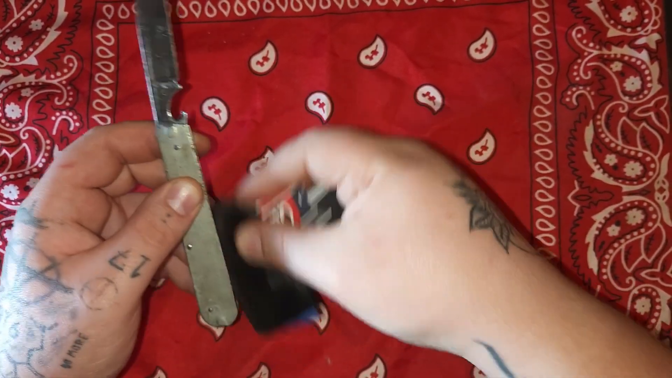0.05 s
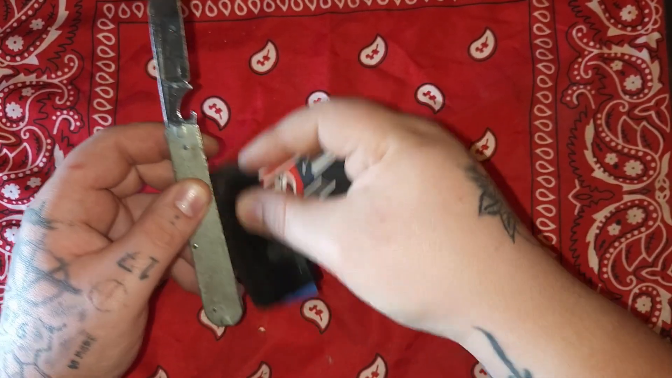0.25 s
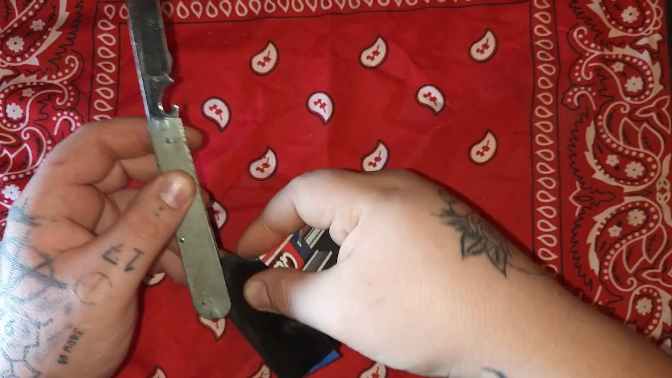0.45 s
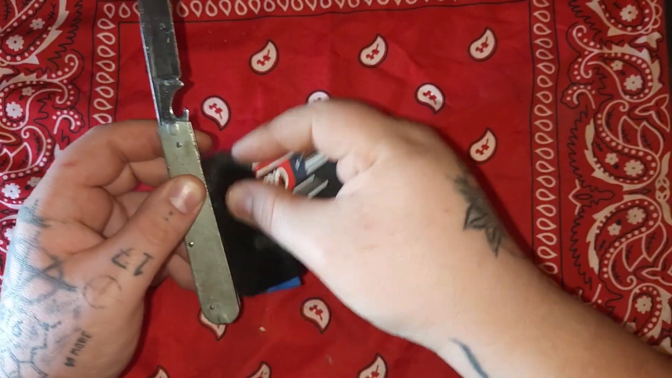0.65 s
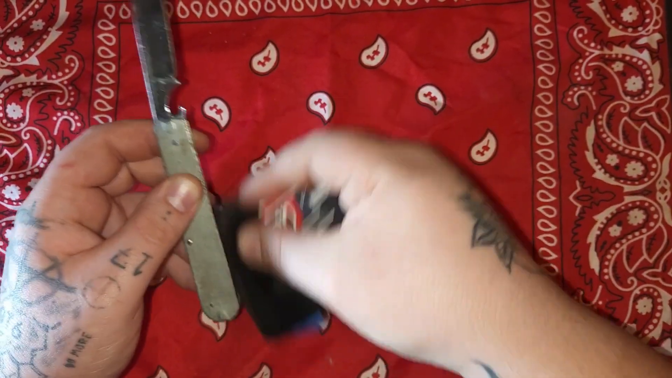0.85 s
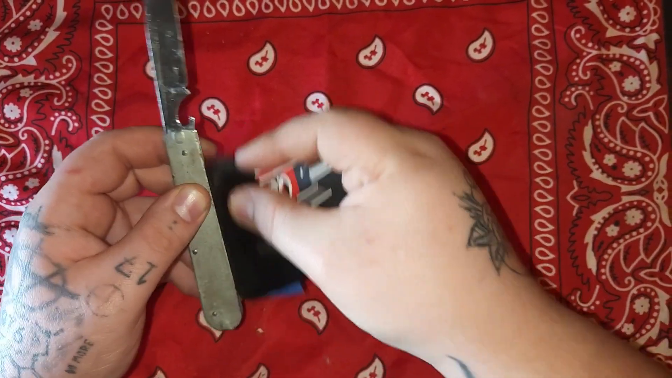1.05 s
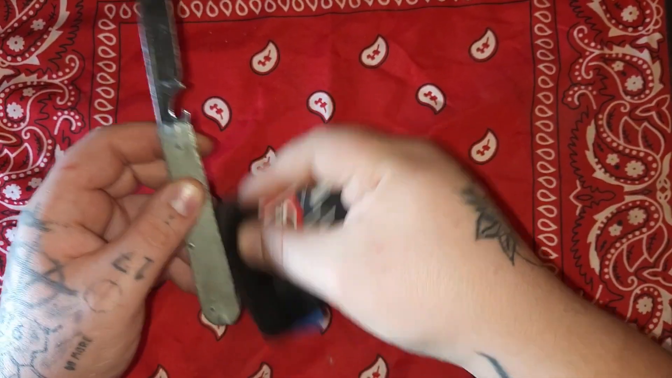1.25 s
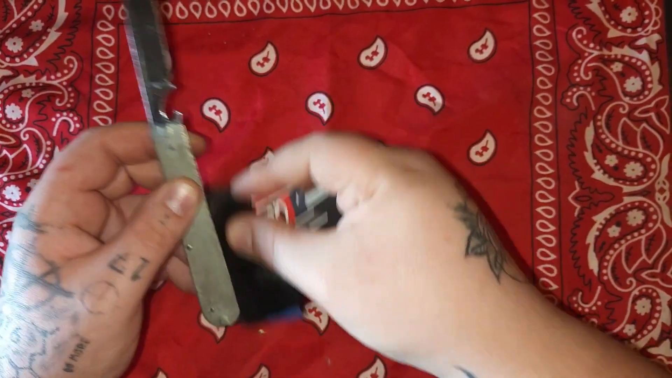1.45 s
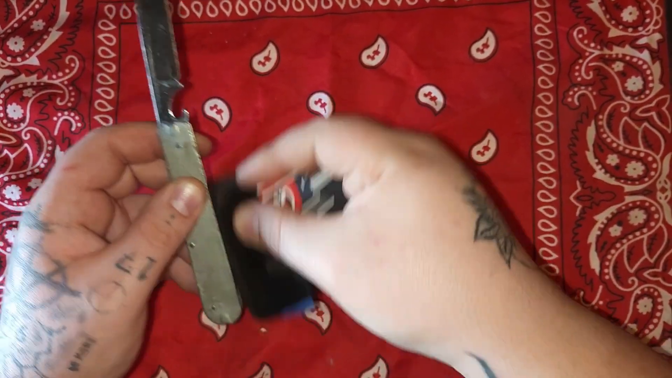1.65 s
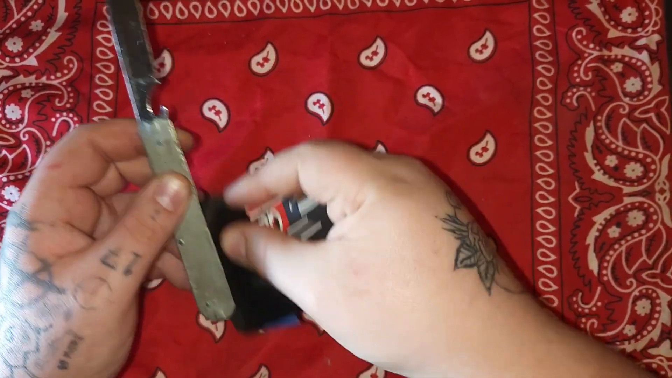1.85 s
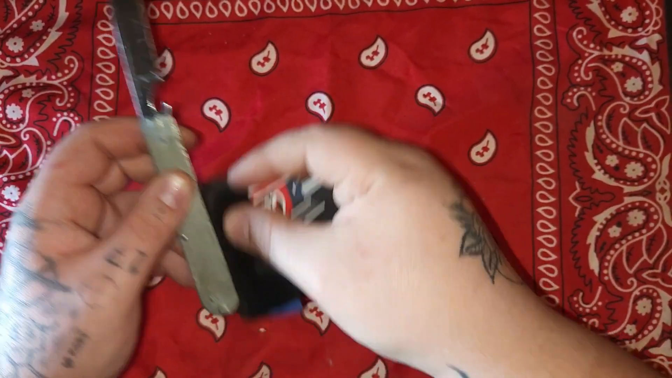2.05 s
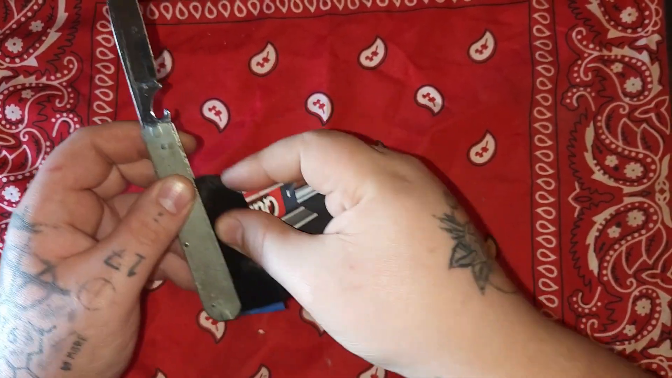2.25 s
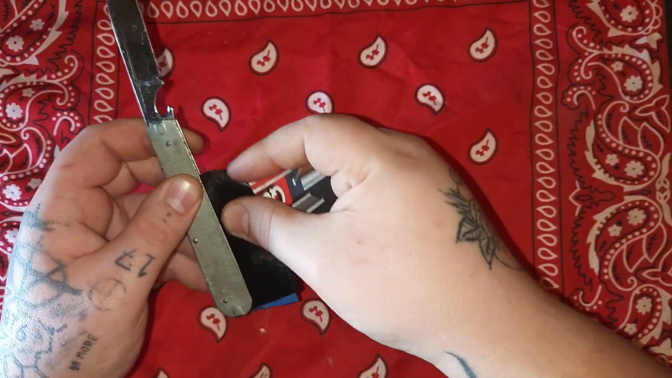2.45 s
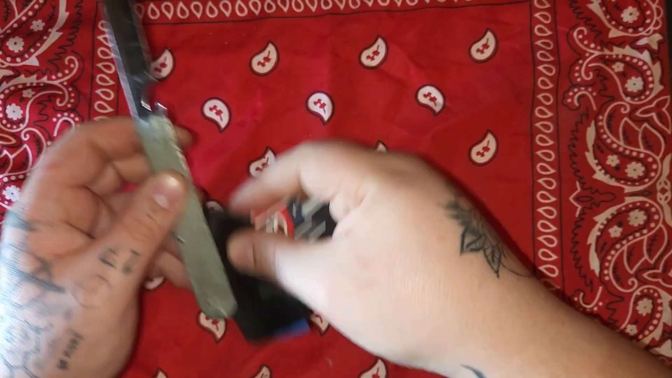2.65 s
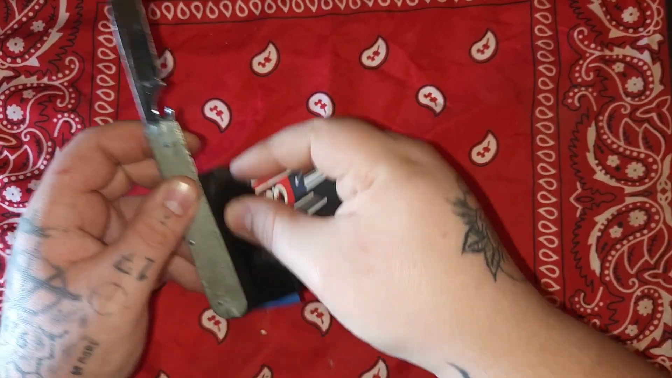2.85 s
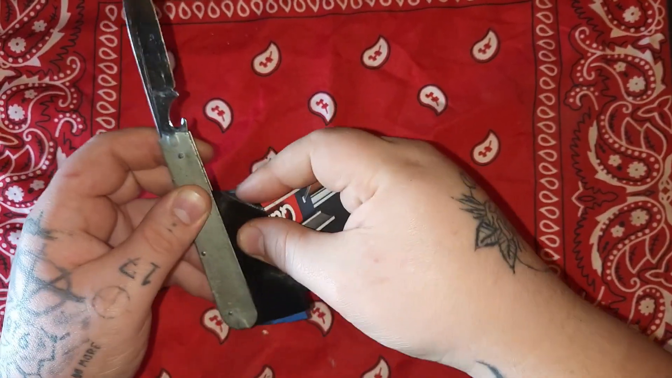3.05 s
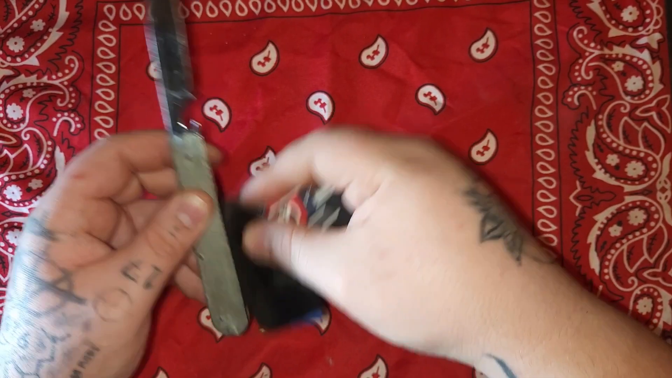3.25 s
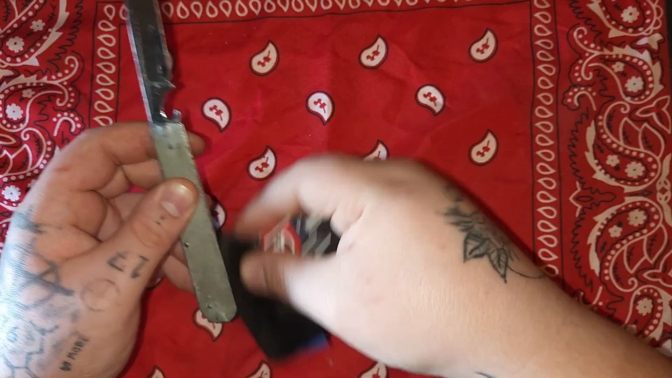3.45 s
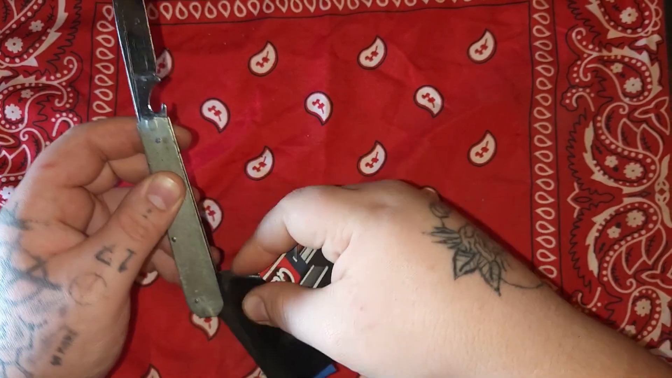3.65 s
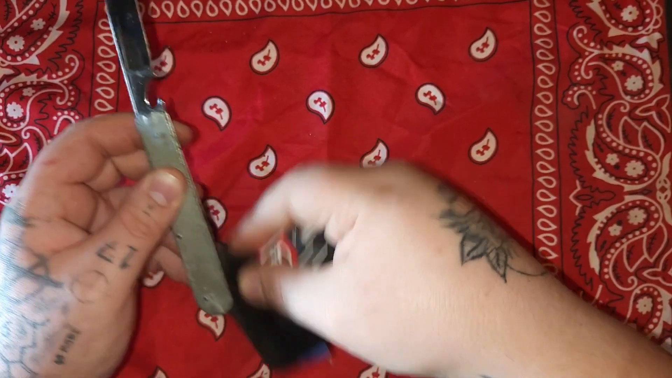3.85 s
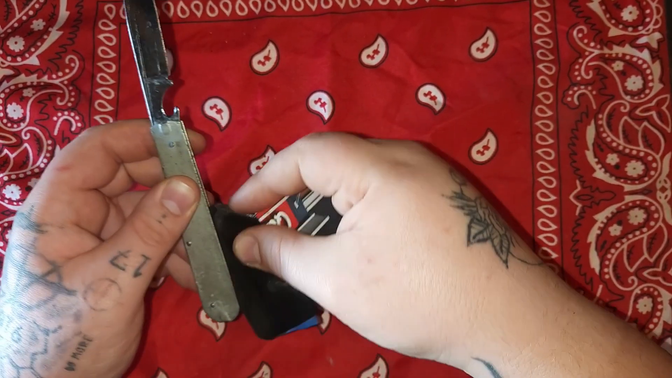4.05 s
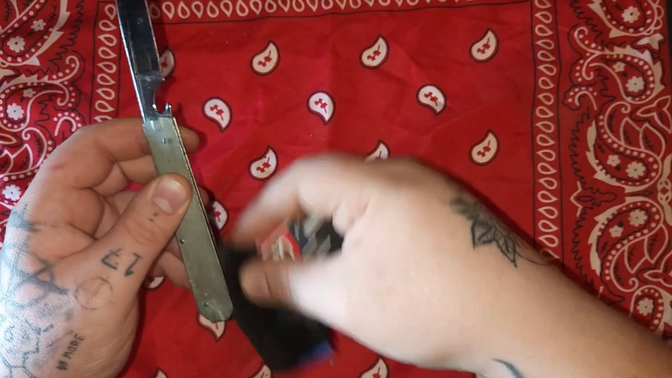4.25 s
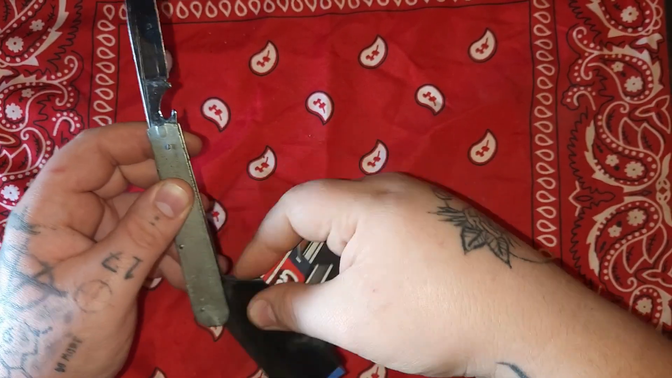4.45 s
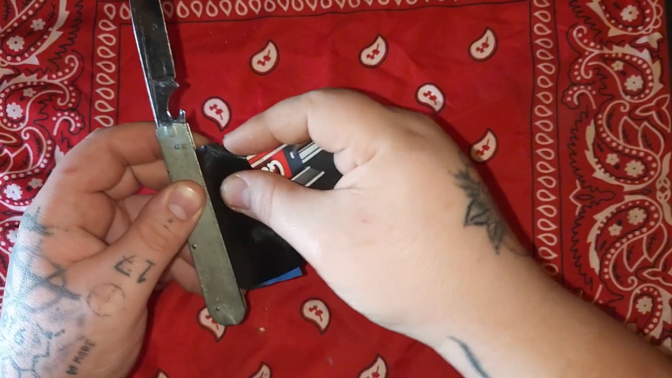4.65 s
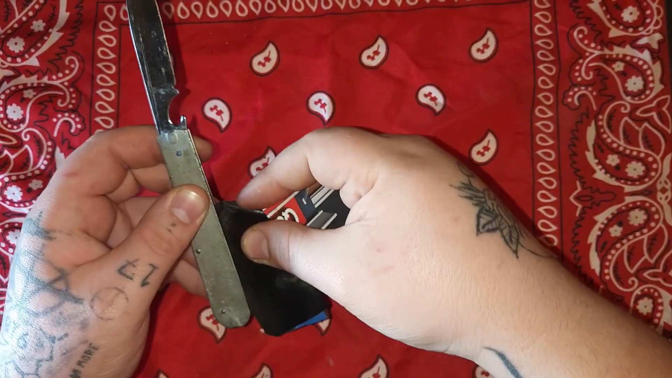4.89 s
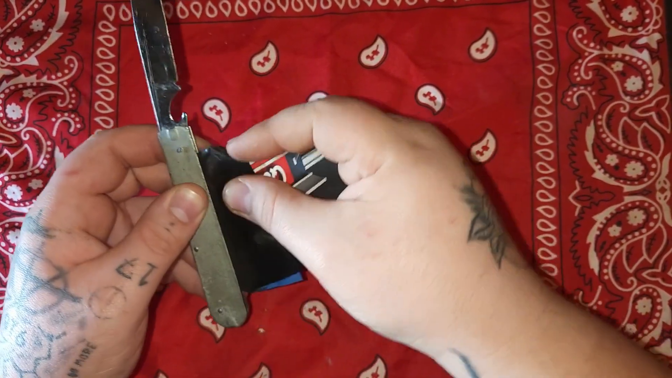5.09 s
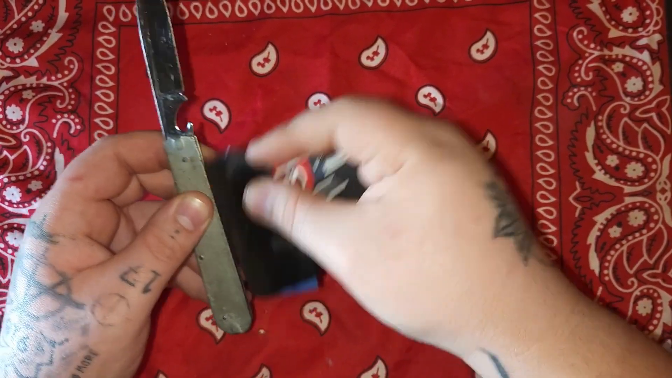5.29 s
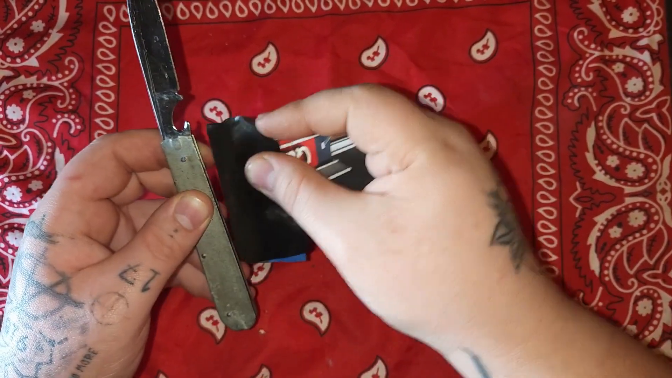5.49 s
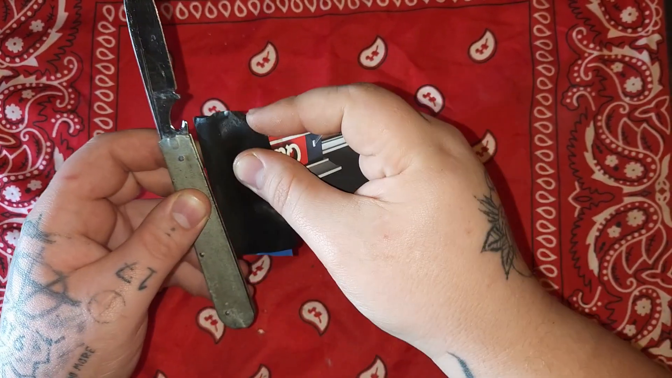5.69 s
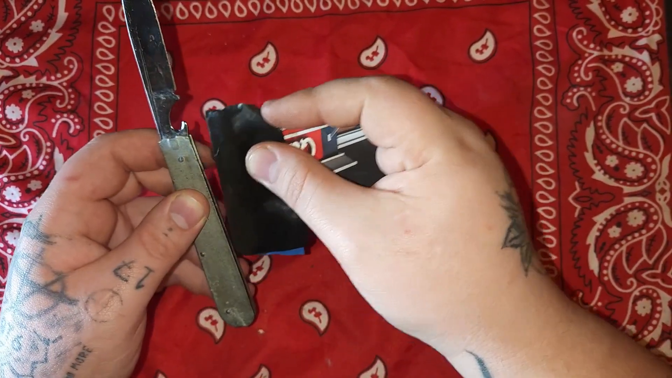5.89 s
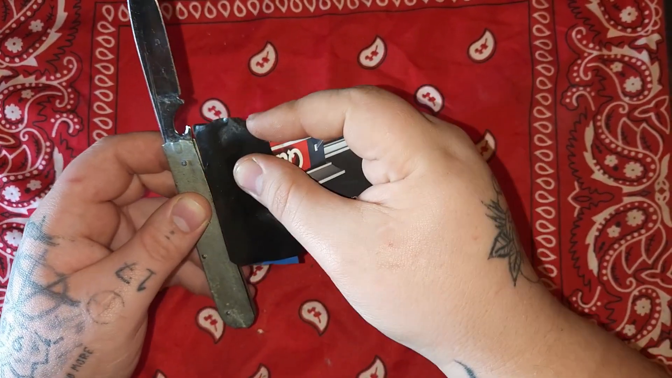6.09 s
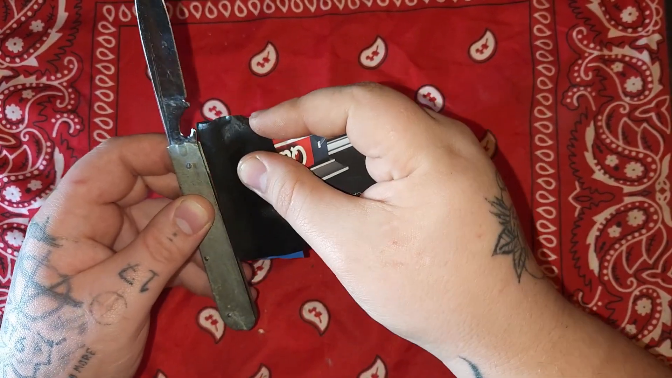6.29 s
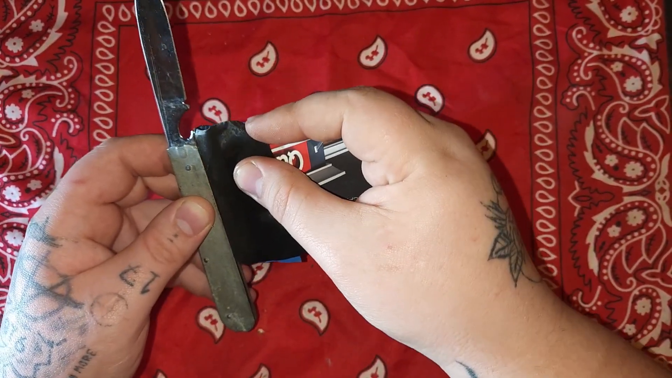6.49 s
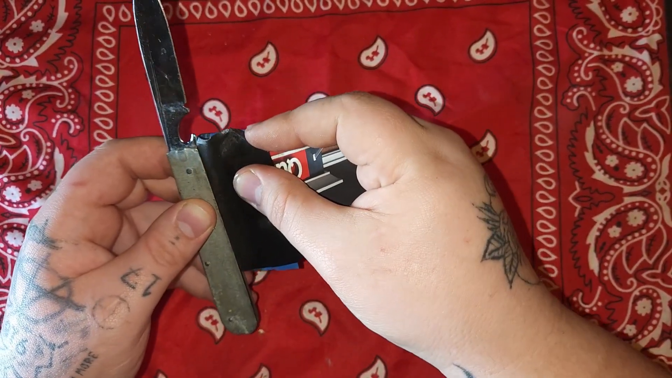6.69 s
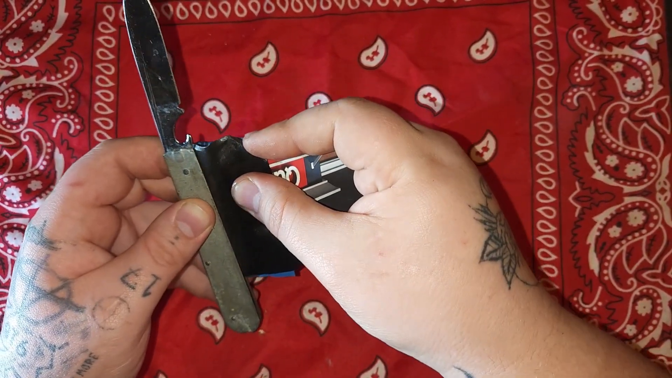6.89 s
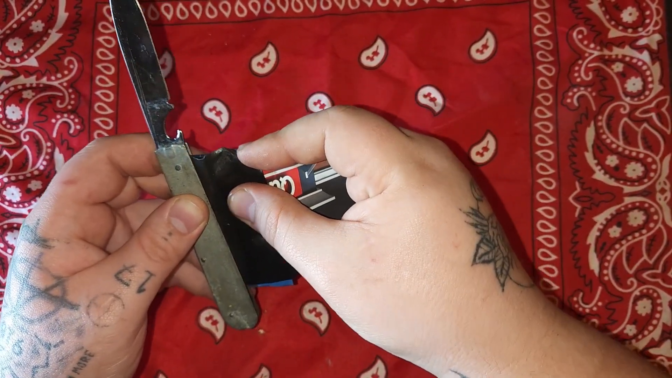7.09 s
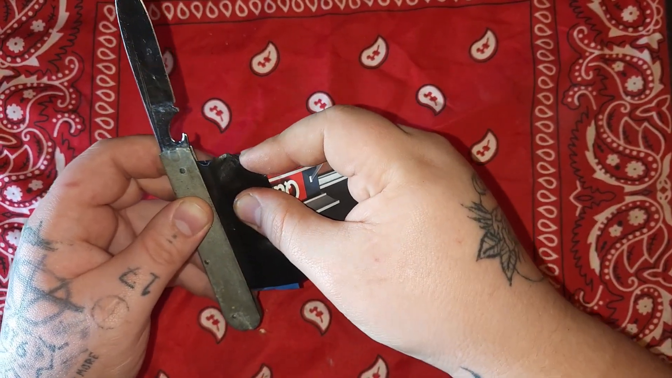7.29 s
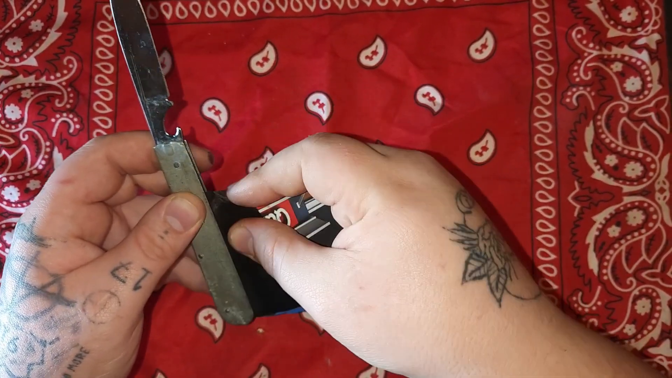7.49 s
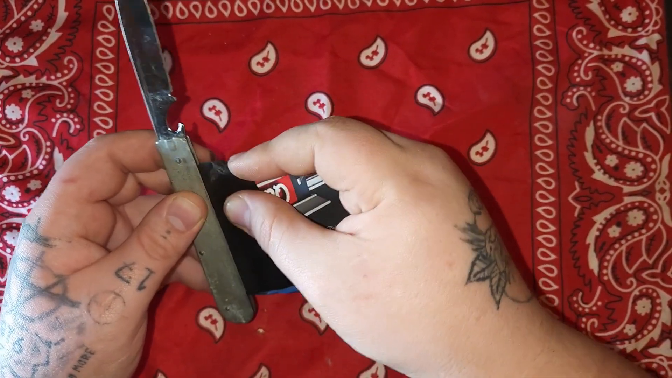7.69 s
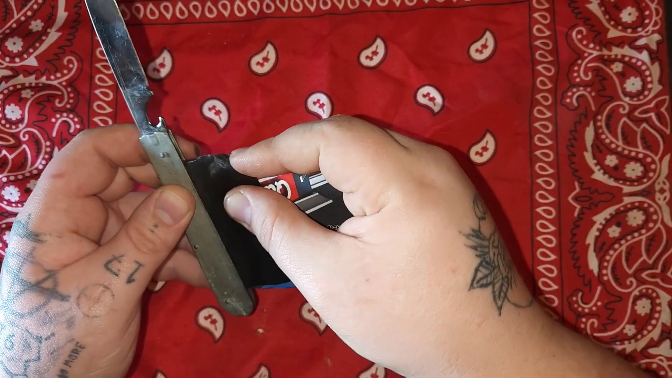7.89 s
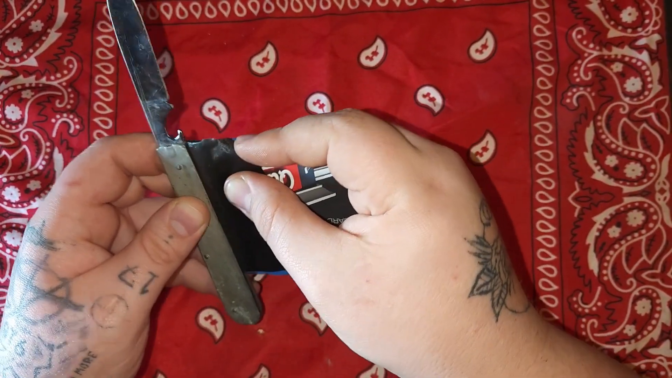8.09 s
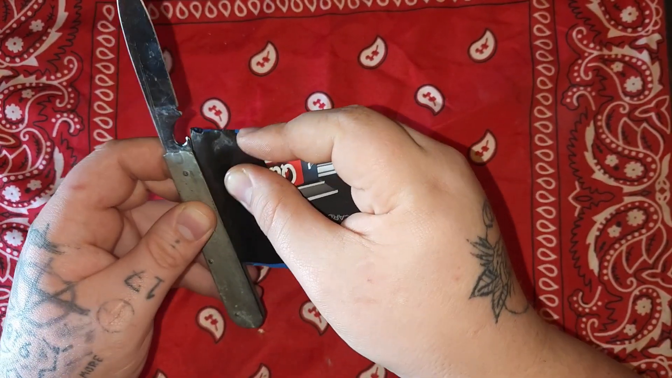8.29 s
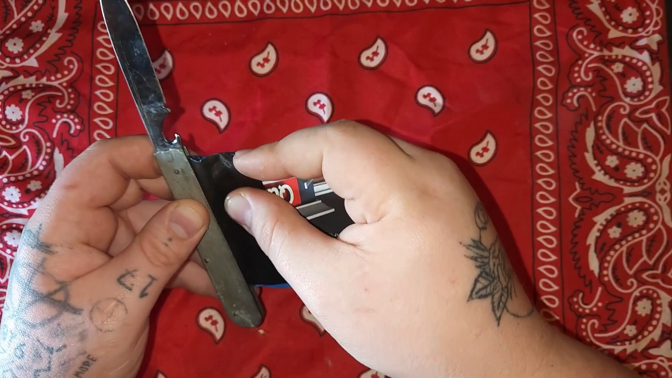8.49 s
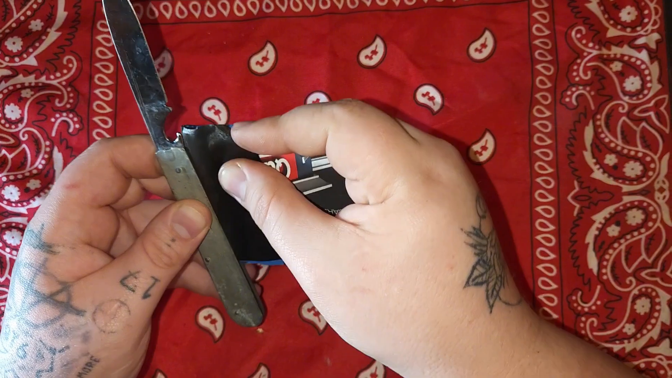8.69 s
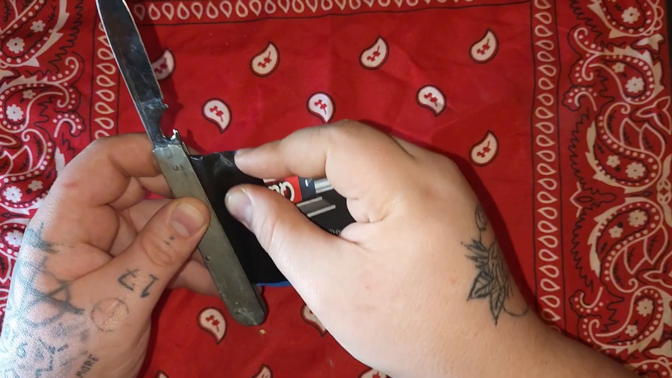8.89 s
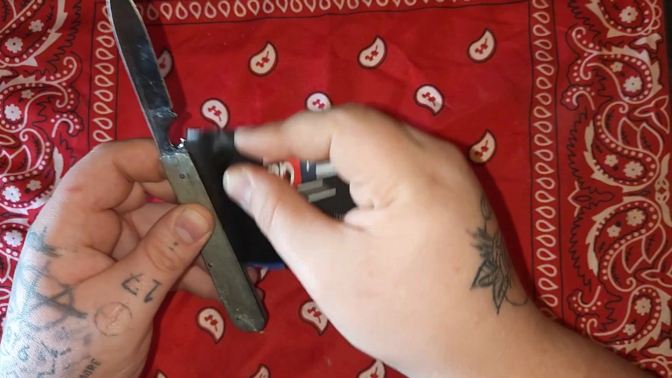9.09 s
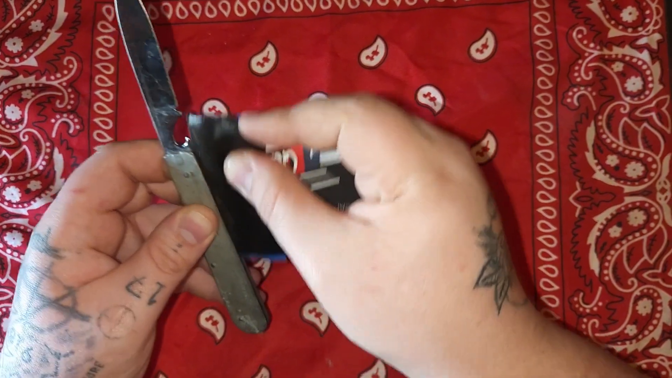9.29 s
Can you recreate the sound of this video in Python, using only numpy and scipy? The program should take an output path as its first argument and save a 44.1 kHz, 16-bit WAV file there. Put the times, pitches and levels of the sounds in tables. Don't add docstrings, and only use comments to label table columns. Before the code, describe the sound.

Rapid dry sanding strokes on metal come in uneven pairs, some hissing, some dull, with sharp taps of a plastic card edge. Cloth rustles softly under the wrists. After a brief lull with knocks, a hard snap and a low thump, faint paper brushing and ticking lead into shorter, crackly rasps. Muffled traffic rumble and an engine hum swell through the walls. Close phone pickup, small short-echo room.

```python
import sys
import numpy as np
from scipy import signal
from scipy.fft import rfft, irfft, next_fast_len
from scipy.io import wavfile
from scipy.ndimage import uniform_filter1d

SR = 44100
rng = np.random.default_rng(int(sys.argv[2]) if len(sys.argv) > 2 else 0)


def waveform_to_disk(signal):
    frames = np.transpose(np.atleast_2d(signal))
    scaled = np.clip(frames, -1, 1) * 32767
    samples = np.round(scaled).astype(np.int16)
    wavfile.write(sys.argv[1], SR, samples)


def volts_from_decibels(level):
    exponent = np.asarray(level, float) / 20
    return 10 ** exponent


N = 411894
TIME = np.arange(N) / SR
NEAR = np.array([[1], [0]])


def evened(x):
    return x / np.sqrt(np.mean(x ** 2) + 1e-20)


def read(points, hz):
    f, value = np.transpose(points)
    return np.interp(np.log(hz + 1), np.log(f + 1), value)


def curves(rows):
    s, *columns = np.transpose(sorted(rows))
    return [np.interp(TIME, s, c) for c in columns]


def coloured(x, points, size=4096):
    gain_db = np.maximum(read(points, abs(np.fft.fftfreq(size, 1 / SR))), -100)
    spectrum = np.exp(np.conj(signal.hilbert(np.log(volts_from_decibels(gain_db)))))
    response = np.fft.ifft(spectrum).real
    return signal.oaconvolve(x, response[None], axes=-1)[:, :N]


def resonate(x, hz, width_hz):
    turn = np.exp(2j * np.pi * np.cumsum(hz * np.ones(N)) / SR)
    r = np.exp(-np.pi * width_hz / SR)
    return 2 * (turn * signal.lfilter([1 - r], [1, -r], x / turn)).real


def filtered(x, order, hz, kind):
    return signal.sosfilt(signal.butter(order, hz, kind, fs=SR, output="sos"), x)


def drift(hz):
    width = int(SR / hz)
    return evened(uniform_filter1d(uniform_filter1d(rng.standard_normal(N), width), width))


def swells(far_db, rows):
    power = sum(volts_from_decibels(db) ** 2 * np.exp(-((TIME - s) / half_s) ** 2) for s, half_s, db in rows)
    return np.sqrt(volts_from_decibels(far_db) ** 2 + power)


# (frequency [Hz], density [dB per Hz])
AIR_SPECTRUM = [(250, -7.5), (400, -20), (650, -3.5), (1080, -12.5), (1500, -19), (5900, -31), (8100, -17),
                (9700, -42), (11500, -42), (15300, -28), (16400, -39)]


def air():
    return volts_from_decibels(-55) * evened(coloured(rng.standard_normal((2, N)), AIR_SPECTRUM))


def tone(hz):
    height = np.sqrt(2) * volts_from_decibels(.8 * drift(hz=4))
    return height * np.sin(2 * np.pi * np.cumsum(hz * (1 + .002 * drift(hz=3))) / SR)


# (nearest [s], half length [s], rumble [dB], boom [dB])
VEHICLES = [
    (0.0, 0.056, -48, -54),
    (2.3, 0.17, -50, -59),
    (3.017, 0.12, -50, -49),
    (5.865, 0.66, -53, -50),
    (6.47, 0.28, -38.5, -47),
    (7.08, 0.12, -37, -39.5),
    (8.488, 0.99, -49.5, -40.5),
]
# (nearest [s], upper tones [dB], lower tone [dB], fade [dB per s])
ENGINE = [
    (0.0, -51, -58, 10),
    (3.998, -59, -65, 14),
    (5.3, -53.5, -57, 10),
    (6.0, -38, -44.5, 24.5),
    (6.9, -51, -50.5, 14),
]
# (frequency [Hz], level [dB])
ENGINE_TONES = [
    (171, -1),
    (187, -11),
    (233, -18),
    (285, -26),
]
# (frequency [Hz], density [dB per Hz])
RUMBLE_SPECTRUM = [(12, -23), (20, -1), (43, -0.5), (65, -2.5), (87, -0.5), (144, -10), (171, -13.5),
                   (195, -28.5), (220, -12), (290, -17), (480, -120)]


def outdoors():
    rumble_gain = swells(-47, [(s, half_s, db) for s, half_s, db, _ in VEHICLES])
    boom_gain = swells(-49, [(s, half_s, db) for s, half_s, _, db in VEHICLES])
    level_s = 0.19
    engine_gain = 0
    for s, upper_db, lower_db, fade in ENGINE:
        away_s = np.hypot(TIME - s, level_s) - level_s
        engine_gain = engine_gain + volts_from_decibels(np.array([[upper_db], [lower_db]]) - fade * away_s)
    upper_gain, lower_gain = engine_gain
    noise = rng.standard_normal((3, 2, N))
    deep = resonate(resonate(noise[2], 40.7, 14.0), 40.7, 14.0)
    rumble = evened(coloured(noise[0], RUMBLE_SPECTRUM, size=16384)) + volts_from_decibels(1.5) * evened(deep)
    rumble = rumble * volts_from_decibels(3.0 * drift(hz=5.0))
    boom = evened(resonate(resonate(noise[1], 77.3, 14.6), 77.3, 14.6))
    upper = sum(volts_from_decibels(db) * tone(hz) for hz, db in ENGINE_TONES)
    engine = upper_gain * upper + lower_gain * tone(124)
    return rumble_gain * rumble + boom_gain * boom + NEAR * engine


# (frequency [Hz], t60 [s])
ROOM_T60 = [(300, 0.081), (1200, 0.18), (2500, 0.22), (6000, 0.15), (12000, 0.14)]


def room(x):
    echoes = np.zeros((2, SR // 2))
    jitter = rng.integers(0, 20, (2, (SR // 2 - 201) // 20))
    at = np.arange(200, SR // 2 - 20, 20) + jitter
    np.put_along_axis(echoes, at, rng.choice([-1., 1.], at.shape), 1)
    hz, t, z = signal.stft(echoes, SR, nperseg=256)
    decay = volts_from_decibels(-60 * t / read(ROOM_T60, hz)[:, None])
    tail = signal.istft(z * decay, SR, nperseg=256)[1]
    return signal.fftconvolve(x, tail / np.linalg.norm(tail[0]), axes=1)[:, :N]


# (frequency [Hz], likeness [0-1])
PORT_LIKENESS = [(60, .995), (140, .93), (260, .74), (600, .9), (1300, .99), (2400, .8), (4400, .65),
                 (8100, .42), (15000, .3)]
# (frequency [Hz], phase [rad])
PORT_LEAD = [(0, 0), (4500, 0), (8000, .4), (10000, 1.3), (16000, 2.2)]
# (frequency [Hz], level [dB])
PORT_BALANCE = [(60, 0.3), (130, 0.5), (290, 1.3), (640, 3.5), (1410, 1), (3100, 2), (5800, 4), (9500, 1.8),
                (15000, 3.6)]


def ports(pair):
    size = next_fast_len(N)
    hz, (a, b) = np.fft.rfftfreq(size, 1 / SR), rfft(pair, size)
    same = np.clip(read(PORT_LIKENESS, hz), 0, 1)
    tilt = volts_from_decibels(read(PORT_BALANCE, hz) / 2)
    right = same * a * np.exp(-1j * read(PORT_LEAD, hz)) + np.sqrt(1 - same ** 2) * b
    return irfft([a * tilt, right / tilt], size)[:, :N]


# (time [s], peak [dB], frequency [Hz])
BENCH_THUMPS = [
    (1.78, -33, 380),
    (1.79, -35, 220),
    (2.3, -36, 370),
    (2.523, -27.5, 154),
    (2.906, -44, 324),
    (4.13, -42, 340),
    (4.428, -46, 356),
    (4.711, -36, 360),
    (6.259, -22, 175),
]


def thumps():
    out, t = np.zeros(N), TIME[:3000]
    for s, db, hz in BENCH_THUMPS:
        out[round(s * SR):][:3000] += volts_from_decibels(db - 60 * t / 0.072) * np.sin(2 * np.pi * hz * t)
    return out


# (time [s], half length [s], level [dB])
FOREARM_SLIDES = [
    (0.2, 0.47, -48),
    (2.21, 0.29, -51),
    (4.292, 0.93, -48),
]


def hands():
    round_thumps = [(s, 0.024, db - 13) for s, db, _ in BENCH_THUMPS]
    gain = swells(-57, round_thumps + FOREARM_SLIDES)
    rustle = filtered(rng.standard_normal((2, N)), 3, [180, 370], "band")
    return gain * volts_from_decibels(-8.5 + 4.1 * drift(hz=26.4)) * evened(rustle)


# (time [s], peak [dB], frequency [Hz], swell [s])
CARD_PINGS = [
    (1.085, -32, 646, 0.0043),
    (5.439, -58, 1100, 0.045),
    (5.519, -33, 750, 0.0053),
    (6.16, -26, 717, 0.0068),
]


def pings():
    out, t = np.zeros((2, N)), TIME[:8820] - .1
    for (s, db, hz, swell_s), z in zip(CARD_PINGS, rng.standard_normal((len(CARD_PINGS), 2, 8820))):
        smooth = uniform_filter1d(z, int(SR * swell_s * 0.85), axis=1)
        note = evened(smooth[0] + 1) * np.sin(2 * np.pi * hz * t + evened(smooth[1]))
        out[:, round(s * SR) - 4410:][:, :8820] += volts_from_decibels(db) * np.exp(-(t / swell_s) ** 2) * note
    return out


def plucks(rows, cycles):
    out, t = np.zeros(N), TIME[:1500]
    for s, db, hz in rows:
        out[round(s * SR):][:1500] += volts_from_decibels(db + 2.5 - 60 * t * hz / cycles) * np.sin(2 * np.pi * hz * t)
    return filtered(out, 2, 520, "high")


# (time [s], peak [dB], frequency [Hz])
GRAIN_TICKS = [(1.613, -14, 5520), (1.7185, -4, 5620), (2.2804, -33, 5380), (2.3156, -35, 8260),
               (2.3496, -35, 7310), (2.386, -31, 7870), (2.5554, -28, 6520), (5.0576, -11, 5380),
               (6.0184, -37, 4830), (6.166, -10, 6350), (6.3787, -35, 5400), (6.4014, -34, 6370),
               (6.4398, -24, 6420), (6.456, -21, 7860), (6.4964, -32, 6400), (6.5226, -13, 8020),
               (6.5524, -18, 5450), (6.5964, -12, 5590), (6.651, -18, 6120), (6.7306, -14, 6500),
               (6.9172, -40, 8260), (6.9357, -31, 6300), (7.1097, -35, 4000), (7.1761, -40, 7880),
               (7.201, -35, 6450), (7.223, -17, 7600), (7.2687, -17, 4790), (7.2983, -14, 4600),
               (7.461, -19, 7400), (7.4974, -41, 4850), (7.9844, -47, 6300), (8.5304, -39, 6390),
               (8.5392, -29, 7330), (8.6622, -26, 5700), (8.6717, -28, 5340)]
# (time [s], peak [dB], frequency [Hz])
EDGE_KNOCKS = [(0.104, -11, 1550), (0.845, -16, 1480), (1.032, -25, 1230), (1.04, -16, 1160),
               (1.048, -14, 1150), (1.056, -20, 1260), (1.303, -13.5, 1200), (1.408, -17, 1180),
               (1.437, -18, 1500), (2.105, -21, 1500), (2.166, -22, 1350), (2.202, -13, 1150),
               (2.237, -34, 1340), (2.302, -29.5, 1130), (2.317, -36, 899), (2.496, -16, 1330),
               (2.555, -28, 1280), (2.57, -29, 1380), (2.899, -30, 1410), (2.936, -23, 1500),
               (4.602, -16, 1470), (4.635, -26, 1280), (4.714, -34, 1140), (4.794, -14, 1510),
               (4.99, -19, 730), (5.023, -30, 795), (5.302, -23, 904), (5.99, -26, 1160), (6.266, -9, 770),
               (6.274, -24, 638), (6.323, -20.5, 670), (6.808, -27, 1150), (7.269, -27, 880),
               (7.37, -22, 1500), (7.526, -35, 1540), (7.607, -28, 1280), (8.069, -31, 1280),
               (9.026, -31, 1280)]
# (time [s], peak [dB], frequency [Hz])
CARD_FLICK = [
    (6.267, -5, 1700),
]


def releases():
    return plucks(GRAIN_TICKS, 14.0) + plucks(EDGE_KNOCKS, 14.0) + plucks(CARD_FLICK, 3.0)


# (time [s], peak [dB], low knock against it [dB])
EDGE_TAPS = [(0.3583, 0, -11), (0.6691, -11, -0.5), (1.3473, -11, -30), (1.3962, -16, -8),
             (2.2276, -11.5, -11), (2.3994, -22, -36), (2.9377, -9.5, -13), (4.1301, -5, -9.5),
             (4.4344, -11, -7), (4.7878, -15, -13), (4.9894, -13, -9), (5.4779, -39, -17),
             (5.5177, -19.5, -6), (5.644, -41, -14), (5.861, -0.5, -9), (5.99, -23, -12), (6.009, -27, -10),
             (6.265, -6.5, 0), (6.268, -17, -3), (6.388, -24.5, -15), (6.4188, -34, -7),
             (6.7096, -12.5, -27), (7.089, -42, -12), (7.131, -23, -8)]
# (frequency [Hz], density [dB per Hz])
GRIT_SPECTRUM = [(880, -57.5), (1500, -1.5), (1740, -9), (2020, -8), (2620, -6.5), (3510, -2.5), (4640, 0),
                 (5440, 1.5), (6780, -2.5), (8280, -2.5), (9620, -20.5), (11400, -11.5), (15100, -11),
                 (15800, -15), (16300, -100)]
# (frequency [Hz], density [dB per Hz])
KNOCK_SPECTRUM = [(200, -28), (450, -20), (760, 3.5), (1250, -9), (2000, -3.5), (3300, -0.5), (5500, -9),
                  (8000, -44.5)]


def taps():
    crack, knock, t = np.zeros((2, N)), np.zeros((2, N)), TIME[:1800]
    t60_s, rise_s = 0.0094, 0.00084
    for (s, db, knock_db), z in zip(EDGE_TAPS, rng.standard_normal((len(EDGE_TAPS), 2, 1800))):
        at = round(s * SR)
        burst = volts_from_decibels(db - 60 * t / t60_s) * np.minimum(t / rise_s, 1) * z
        crack[:, at:at + 1800] += burst
        knock[:, at:at + 1800] += volts_from_decibels(knock_db) * burst
    return volts_from_decibels(8.0) * coloured(crack, GRIT_SPECTRUM) + volts_from_decibels(15) * coloured(knock, KNOCK_SPECTRUM)


def grains(per_s, spread_db):
    size = volts_from_decibels(spread_db * np.minimum(rng.exponential(1, N), 4.2)) * (rng.random(N) < per_s / SR)
    return size * rng.choice([-1., 1.], (2, N))


def patchy(x, depth_db):
    z = signal.stft(x, nperseg=256)[2]

    def patches(frames):
        across = uniform_filter1d(rng.standard_normal(z.shape[1:]), size=4, axis=0)
        return evened(uniform_filter1d(across, size=frames, axis=1))

    gain_db = depth_db * patches(12) + 1.73 * patches(36)
    return signal.istft(z * volts_from_decibels(gain_db), nperseg=256)[1][:, :N]


# (time [s], length [s], first level [dB], last level [dB])
PUSH_STROKES = [(0.175, 0.12, -14.5, -17), (0.495, 0.11, -15.5, -16), (0.807, 0.11, -15.5, -16),
                (1.577, 0.12, -16, -15), (2.006, 0.1, -14.5, -16), (2.177, 0.025, -17, -6.5),
                (2.461, 0.037, -16.5, -7), (2.782, 0.092, -12, -17), (2.9, 0.011, -13.5, -4.5),
                (3.108, 0.071, -15, -13.5), (3.687, 0.08, -16.5, -13), (3.938, 0.09, -17, -16),
                (4.22, 0.095, -15, -14), (4.365, 0.076, -16.5, -15.5), (4.472, 0.14, -16.5, -15),
                (4.943, 0.048, -13, -13.5)]
# (time [s], length [s], first level [dB], last level [dB])
PULL_STROKES = [(0.0, 0.12, -12.5, -17.5), (0.34, 0.11, -12.5, -18.5), (0.66, 0.11, -11.5, -18.5),
                (1.052, 0.097, -12.5, -18.5), (1.226, 0.083, -12, -19.5), (1.419, 0.11, -13.5, -16.5),
                (1.78, 0.13, -16, -15), (2.595, 0.098, -12, -18), (3.219, 0.12, -12, -18),
                (3.433, 0.079, -10, -24.5), (3.537, 0.083, -14, -15), (3.809, 0.082, -10, -20.5),
                (4.07, 0.078, -14.5, -21), (4.761, 0.095, -14, -21.5), (5.144, 0.064, -15, -18),
                (5.236, 0.068, -12, -18)]
# (time [s], length [s], first level [dB], last level [dB])
TURN_DRAGS = [(0.305, 0.049, -28, -22), (0.6, 0.026, -27, -28), (0.628, 0.033, -29, -19),
              (0.94, 0.064, -31, -28), (1.142, 0.068, -35, -38.5), (1.298, 0.077, -46.5, -19),
              (1.388, 0.068, -21.5, -20.5), (1.714, 0.092, -28, -21), (2.111, 0.068, -42, -19.5),
              (2.198, 0.075, -24, -44.5), (2.298, 0.038, -55, -45), (2.506, 0.1, -41.5, -33.5),
              (2.922, 0.048, -45, -32.5), (3.516, 0.033, -32, -30), (3.61, 0.085, -38.5, -28),
              (3.767, 0.031, -16, -30), (3.89, 0.07, -34, -29), (4.156, 0.044, -36.5, -26.5),
              (4.665, 0.057, -53, -45), (4.727, 0.089, -33, -18), (4.875, 0.06, -43, -46),
              (5.009, 0.079, -46, -29.5), (5.09, 0.086, -42, -18), (5.21, 0.031, -33, -21),
              (5.805, 0.067, -38, -25), (6.132, 0.022, -23, -15.5), (6.161, 0.011, -18, -20.5),
              (6.271, 0.039, -42, -45), (6.3, 0.017, -36, -35), (6.318, 0.022, -24.5, -24),
              (7.671, 0.055, -33.5, -43.5)]
# (time [s], length [s], first level [dB], last level [dB])
PAPER_BRUSHES = [(2.887, 0.025, -52, -41), (3.32, 0.05, -37, -32), (4.642, 0.03, -24, -41),
                 (5.52, 0.065, -31, -34.5), (5.622, 0.057, -38.5, -48.5), (6.075, 0.044, -41, -37.5),
                 (6.43, 0.018, -35.5, -30), (6.45, 0.012, -37, -32), (6.506, 0.022, -33, -27.5),
                 (6.535, 0.072, -35.5, -29), (6.627, 0.14, -29.5, -37), (6.755, 0.062, -30.5, -24.5),
                 (7.105, 0.022, -36.5, -36), (7.2, 0.047, -39, -32), (7.262, 0.034, -29, -24),
                 (5.04, 0.04, -37, -40), (2.27, 0.05, -56, -57), (7.45, 0.1, -57, -38.5),
                 (7.735, 0.12, -31, -28), (8.216, 0.1, -33, -50.5), (8.655, 0.03, -43, -48),
                 (9.002, 0.032, -56, -37), (9.038, 0.067, -30, -17), (9.158, 0.047, -58, -34)]
# (time [s], length [s], first level [dB], last level [dB])
JOINT_NICKS = [(6.955, 0.038, -23.5, -23), (6.998, 0.05, -12.5, -21.5), (7.305, 0.063, -20.5, -6.5),
               (7.57, 0.043, -11.5, -17.5), (7.891, 0.039, -28.5, -18.5), (7.998, 0.077, -19, -20.5),
               (8.133, 0.1, -24, -21.5), (8.327, 0.078, -23.5, -16.5), (8.389, 0.04, -15.5, -19),
               (8.557, 0.066, -20, -13), (8.753, 0.077, -17, -18), (8.908, 0.082, -14, -24),
               (9.07, 0.074, -21, -13.5), (9.22, 0.086, -11.5, -22.5)]
RING_CLIMB = [
    0.17,
    -0.048,
    0.057,
    0.13,
    0.031,
]
# (rows, card body [dB], fizz against grit [dB], rise [s], fall [s])
CONTACTS = [(PUSH_STROKES, -12, -8.5, 0.0066, 0.004), (PULL_STROKES, -14.5, -8, 0.0075, 0.0044),
            (TURN_DRAGS, -3.5, -14.5, 0.0047, 0.0022), (PAPER_BRUSHES, -9, -9.5, 0.0055, 0.004),
            (JOINT_NICKS, -13.5, -10.5, 0.0066, 0.0039)]


def strokes():
    power = np.ones((3, N)) * volts_from_decibels(np.array([[-66], [-72], [-72]])) ** 2
    slide = np.zeros(N)
    arch_db, bite_db, bite_s, touch_s = 0, -1.5, 0.016, 0.0087
    for (rows, body_db, fizz_db, rise_s, fall_s), climb in zip(CONTACTS, RING_CLIMB):
        split = volts_from_decibels(np.array([[0], [body_db], [fizz_db]])) ** 2
        for s, length_s, first_db, last_db in rows:
            near = slice(max(round((s - .04) * SR), 0), round((s + length_s + .06) * SR))
            t = TIME[near] - s
            along = np.clip(t / length_s, 0, 1)
            edges = 1 / (1 + np.exp(-t / rise_s)) / (1 + np.exp((t - length_s + 0.0022) / fall_s))
            edges = edges / (1 + np.exp(-(t + touch_s) / 0.0012))
            shape_db = arch_db * (np.sin(np.pi * along) - 0.7167)
            shape_db = shape_db + bite_db * np.exp(-np.maximum(t, 0) / bite_s)
            stroke = (volts_from_decibels(first_db + (last_db - first_db) * along + shape_db) * edges) ** 2
            power[:, near] += stroke * split
            slide[near] += stroke * climb * (along - .5)
    return (*np.sqrt(power), slide / power[0])


# (time [s], edge ring [Hz], face ring [Hz], overhang [0-1], finger damping [dB])
CARD_HOLD = [(0.0, 5140, 1580, 0.2, -5.5), (0.8, 5560, 1920, 0.44, -2), (1.05, 5230, 1470, 0.37, -0.5),
             (2.2, 6080, 1560, 0.36, -2), (2.6, 5300, 1640, 0.17, -4), (4.45, 5080, 1880, 0.32, -1),
             (5.4, 5620, 1170, 0.65, 2.5), (7.0, 5300, 1170, 0.89, -1), (7.54, 5730, 1410, 0.15, -1.5),
             (7.9, 6300, 1340, 0.93, -4), (8.45, 5740, 1460, 0.92, 2.5), (9.0, 5920, 1190, 1, 8)]
# (frequency [Hz], density [dB per Hz])
CARD_SPECTRUM = [(180, -32.5), (300, -74), (455, -17.5), (677, -4), (734, -7.5), (1110, 0.5), (1510, 9),
                 (1730, 5), (2020, 6), (2600, -9.5), (3380, -48.5), (5720, -120)]


def sanding():
    rub, body, fizz, slide = strokes()
    edge_hz, face_hz, overhang, damp_db = curves(CARD_HOLD)
    edge_hz = edge_hz * (1 + slide)
    edge_db = -16 + 15 * overhang
    face_db = -11.5 + 19.5 * overhang
    flap_db = -27.5 - 20 * overhang

    speed = np.clip((20 * np.log10(rub) + 38) / 22, 0, 1)
    per_s = 2500 + 14000 * speed
    snaps = volts_from_decibels(-31.0) * (1 - speed) * grains(150, spread_db=2.0)
    catch = grains(per_s, spread_db=0.5) / np.sqrt(per_s) + snaps
    lumps_db = (1.0 + 1.5 * (1 - speed)) * drift(hz=105) + 1.3 * drift(hz=395)

    edge_ring = evened(resonate(resonate(catch, edge_hz, 2050), edge_hz, 2020))
    grit = evened(coloured(catch, GRIT_SPECTRUM)) + volts_from_decibels(edge_db) * edge_ring
    top = filtered(grit, 4, 9300, "high")
    low = filtered(grit, 4, 9300, "low")

    flex = catch + grains(per_s, spread_db=4.5) / np.sqrt(per_s)
    card = evened(coloured(flex, CARD_SPECTRUM)) + volts_from_decibels(face_db) * evened(resonate(flex, face_hz, 850))
    flap = resonate(resonate(flex, 568, 120), 568, 120)
    card = filtered(card + volts_from_decibels(flap_db) * evened(flap), 4, 470, "high")

    rubbed = volts_from_decibels(-2.0) * rub * evened(low)
    fizzed = volts_from_decibels(6.0 + 0.21 * damp_db) * fizz * evened(top)
    carded = volts_from_decibels(0.5 - damp_db) * body * evened(card)
    return volts_from_decibels(lumps_db) * patchy(rubbed + fizzed + carded, depth_db=1.54)


def scene():
    bench = sanding() + taps() + pings() + NEAR * releases()
    echo = volts_from_decibels(-14.0) * room(bench)
    return ports(bench + echo + NEAR * thumps() + hands() + outdoors() + air())


def roll_off(x):
    return signal.sosfilt(signal.butter(12, 16480, fs=SR, output="sos"), x)


def record(dry):
    limit = signal.firwin(511, 15850, window=("kaiser", 5), fs=SR)
    mix = signal.oaconvolve(np.clip(dry, -1, 1), limit[None], "same")
    return roll_off(mix)


dry = scene()
out = record(dry)
waveform_to_disk(out)
```